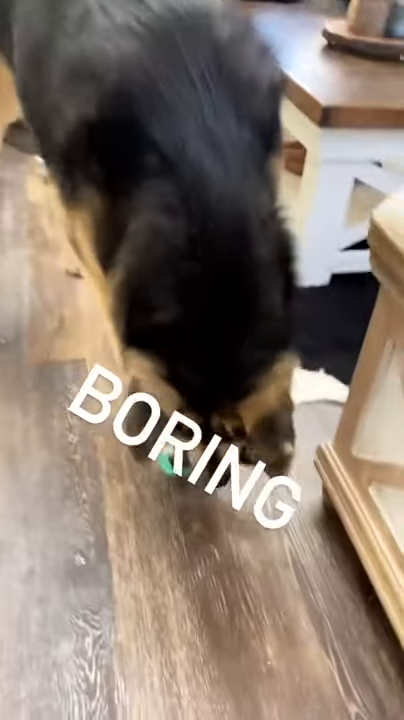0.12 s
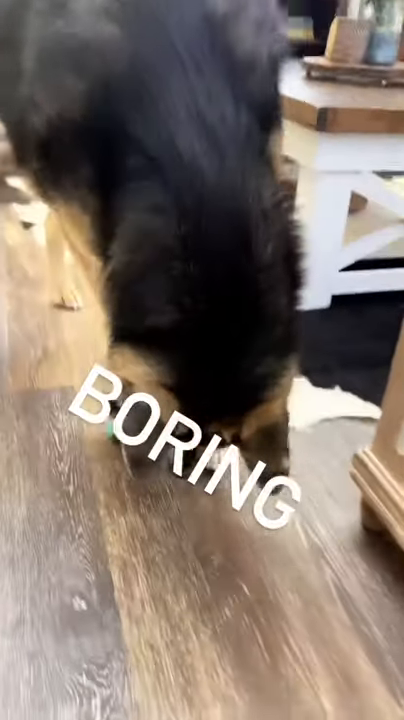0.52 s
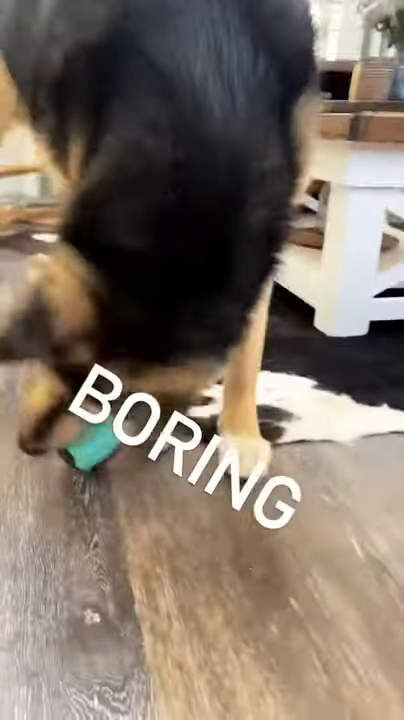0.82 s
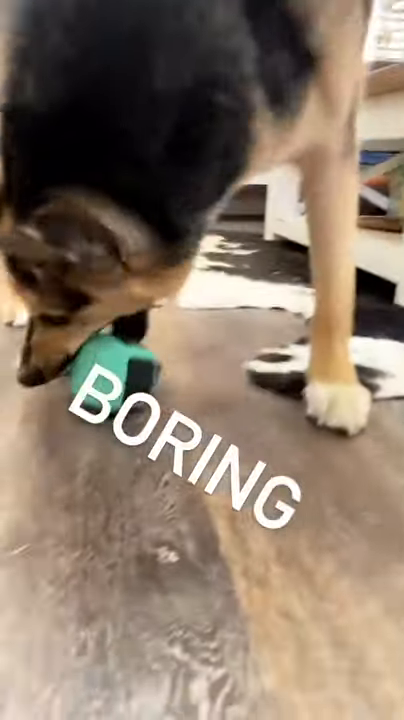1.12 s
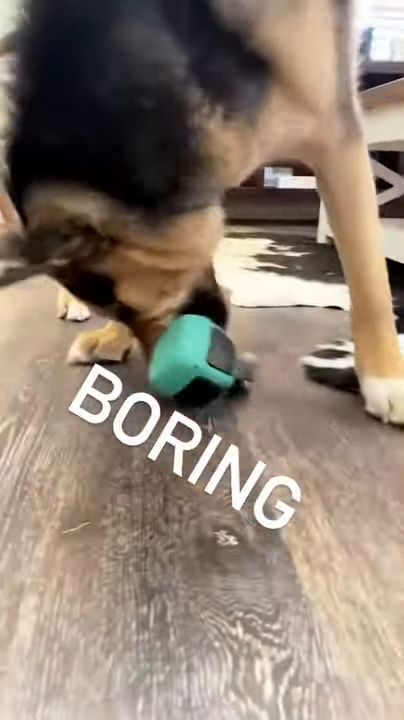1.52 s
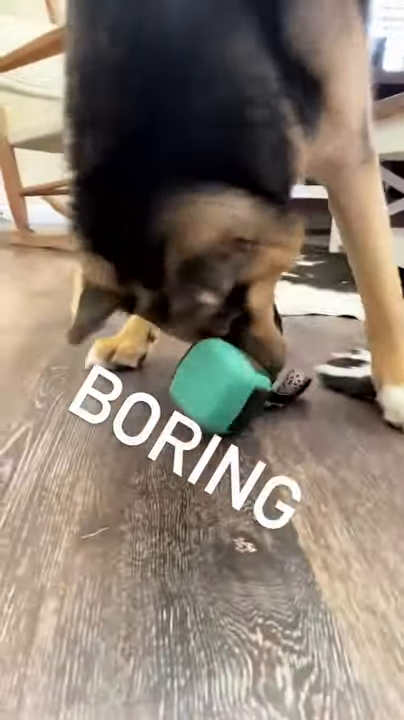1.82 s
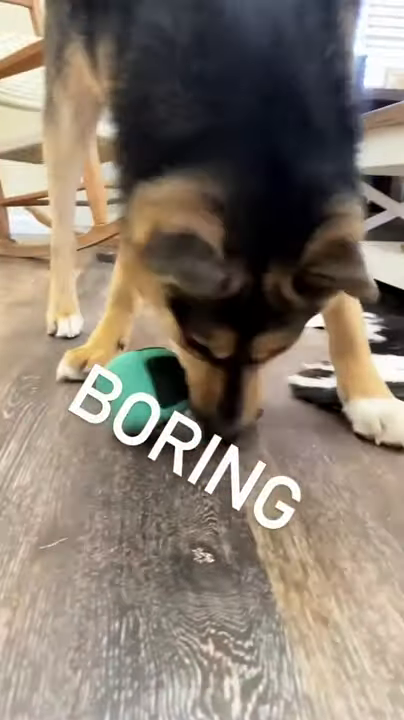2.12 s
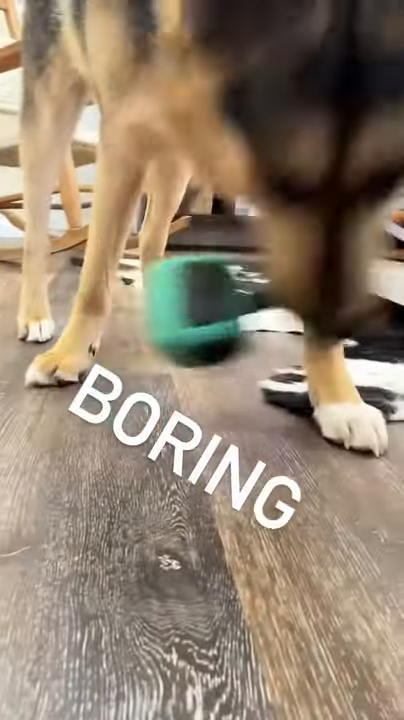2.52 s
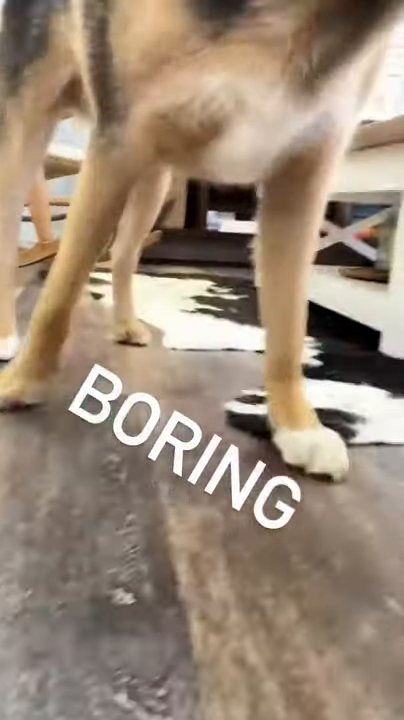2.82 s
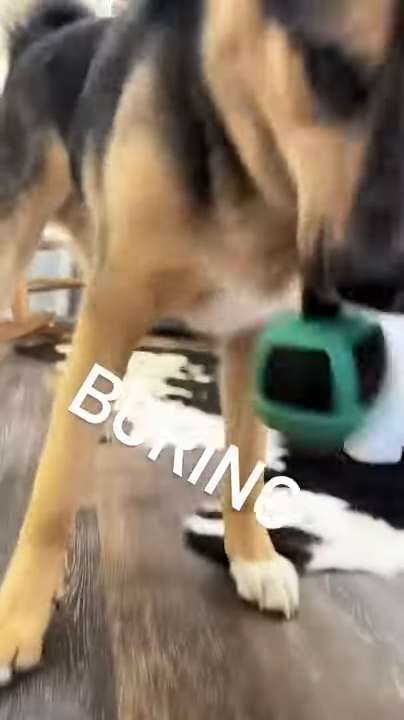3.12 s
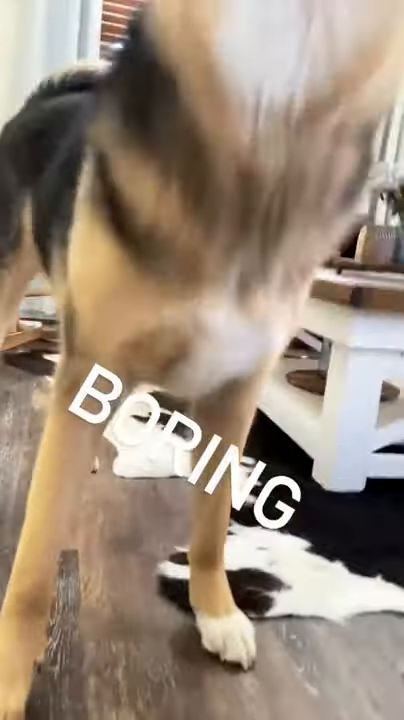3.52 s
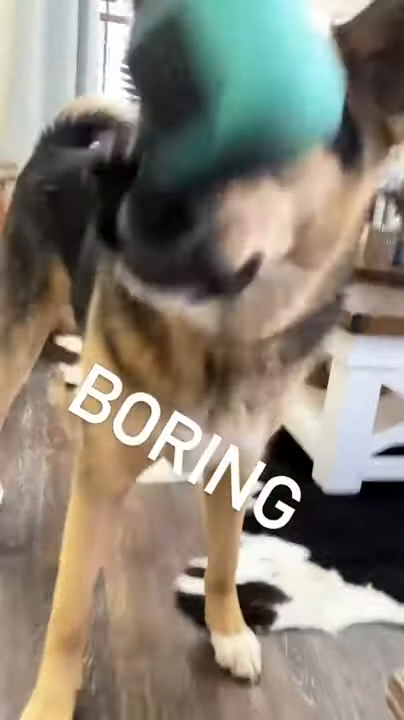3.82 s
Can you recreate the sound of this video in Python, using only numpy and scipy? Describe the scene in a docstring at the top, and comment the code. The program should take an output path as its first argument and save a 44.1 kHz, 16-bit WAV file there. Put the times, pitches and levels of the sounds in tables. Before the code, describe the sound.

A dog handles a soft ball on a wooden floor, close up. A knock with claw ticks lands at 0.27 s, dull thuds near 0.6, then scuffs, low thuds and a bright, loud tick cluster around 0.9-1.05. Lighter knocks follow at 1.25; 1.4-1.9 is nearly quiet. Breathy pants come at 2.0-2.2 and 2.7, a crisp knock at 2.93, nose puffs from 3.1, knocks at 3.35, and faint rubbing over low house hum in a short room echo.

```python
"""A large dog noses and swings a soft ball on a wooden floor, close to a phone with two microphone ports.
Claws and teeth tick and the ball knocks (noise bursts ringing one resonance); paws thud the boards (damped
modes); fur and fabric scuff and rub, with a few hollow, breathy pants (grainy noise); the dog puffs through
its nose (noise in gliding resonances). A house hums and rumbles underneath; a hand shifts on the phone."""
import sys
import numpy as np
from scipy import signal
from scipy.fft import rfft, irfft
from scipy.io import wavfile
from scipy.ndimage import uniform_filter1d, map_coordinates

SR = 44100
rng = np.random.default_rng(int(sys.argv[2]) if len(sys.argv) > 2 else 0)


def waveform_to_disk(signal):
    """Save audio, clipped to [-1, 1], as 16-bit WAV at the path in sys.argv[1]."""
    frames = np.transpose(np.atleast_2d(signal))
    scaled = np.clip(frames, -1, 1) * 32767
    samples = np.round(scaled).astype(np.int16)
    wavfile.write(sys.argv[1], SR, samples)


N = 174195
OPPOSITE = np.array([[1], [-1]])  # sign of a difference signal at the left and right port


def undb(db):
    """dB to gain."""
    return 10 ** (np.asarray(db) / 20)


def unit(x):
    """Scale to rms 1."""
    return x / np.sqrt(np.mean(x ** 2))


def bins_hz():
    """Frequency of every spectrum bin."""
    return np.arange(N // 2 + 1) * SR / N


def over_hz(table):
    """Read a (hz, value) table at every bin, along log frequency."""
    hz, value = np.array(table).T
    return np.interp(np.log(bins_hz() + 1), np.log(hz), value)


def shape(x, gain):
    """Filter by a gain per bin."""
    return irfft(rfft(x) * gain, N)


def tilt(db_per_octave):
    """Spectral slope about 2 kHz, flat outside 125 Hz to 16 kHz."""
    return undb(over_hz([(125, -4 * db_per_octave), (16000, 3 * db_per_octave)]))


def walk(rate_hz):
    """Slow random drift of rms 1: random steps, smoothed twice."""
    step = int(SR / rate_hz)
    steps = np.repeat(rng.standard_normal(size=500), step)[:N]
    return unit(uniform_filter1d(uniform_filter1d(steps, step), step))


def swell(start_s, attack_s, hold_s, release_s):
    """Squared rise, hold, then a fall of 20 dB per release time."""
    t = np.arange(N) / SR - start_s
    rise = np.clip(t / attack_s, 0, 1) ** 2
    fall_db = -20 * np.clip(t - attack_s - hold_s, 0, None) / release_s
    return rise * undb(fall_db)


def add(out, start_s, x):
    """Mix x into out from start_s."""
    i = int(start_s * SR)
    out[i:i + len(x)] += x[:N - i]


def house():
    """Rumble and faint hiss, partly unrelated at the two ports, with a hum wavering in pitch and level."""
    # hz, relative_db
    house_colour = [(25, -25), (42, -17), (60, -6), (70, -15), (86, -6.5), (120, -17.5), (156, -8.5),
                    (190, -18), (300, -26.5), (600, -41.5), (1500, -53), (4000, -61.5), (8000, -67.5),
                    (13000, -65)]
    # hz, side_to_mid_ratio: unrelated sound at the two ports
    house_diffuse = [(60, .01), (110, 0.02), (200, 0.093), (370, 0.45), (700, 0.75), (3000, 0.77),
                     (13000, 0.32)]
    rumble_db = -52
    hum_hz, hum_db, waver_hz, waver_db = 50.64, -51.5, 0.78, 0.6
    colour = undb(over_hz(house_colour))
    mid = shape(rng.standard_normal(N), colour)
    side = shape(rng.standard_normal(N), colour * over_hz(house_diffuse))
    rumble = undb(rumble_db) * (mid + side * OPPOSITE) / np.std(mid)
    phase = 2 * np.pi * np.cumsum(hum_hz + waver_hz * walk(6.18)) / SR
    hum = np.sin(phase) * undb(hum_db + waver_db * walk(4.4))
    return rumble + np.sqrt(2) * hum  # sqrt(2): hum_db is rms


def grains():
    """Dense tiny bursts of uneven size, over an equal share of steady noise."""
    grains_per_s, spread_db = 2500, 2.5
    happens = rng.random(N) < grains_per_s / SR
    bursts = happens * undb(spread_db * np.minimum(rng.exponential(size=N), 3.5))
    grainy = uniform_filter1d(bursts, size=12) * rng.standard_normal(N)
    return unit(grainy) + rng.standard_normal(N)


def hollow():
    """Hollow resonances of the scuffs and pants, pitched a little differently on each."""
    # pitch_hz, width_hz, lift_db
    hollow_modes = [(435, 52, 6), (1093, 42, 6), (1270, 1100, 10), (2170, 620, 6.5), (3370, 1200, 3),
                    (5850, 770, 5)]
    f = bins_hz()
    shift = 1 + 0.011 * rng.standard_normal()
    lift_db = sum(db / (1 + ((f - hz * shift) / (width / 2)) ** 2) for hz, width, db in hollow_modes)
    return undb(lift_db)


def scuffs_and_pants():
    """Grainy rubbing of fur, pads and fabric, and a few hollow, breathy pants, over a continuous faint rustle."""
    # start_s, attack_s, hold_s, release_s, level_db, tilt_db_per_octave
    # pants: near 2.0-2.2 and 2.7 s
    bursts = [(0.275, 0.006, 0.058, 0.23, -53.5, 8), (0.342, 0.024, 0.085, 0.041, -56.5, -2.5),
              (0.817, 0.021, 0.024, 0.037, -45.5, 9.5), (0.876, 0.014, 0.019, 0.027, -49, 9),
              (1.265, 0.0065, 0.029, 0.033, -62, 2), (1.318, 0.064, 0.13, 0.061, -63.5, 17),
              (1.921, 0.014, 0.066, .05, -67, 10), (2.008, 0.055, 0.076, 0.11, -50.5, -1.4),
              (2.089, 0.049, 0.045, 0.13, -52, -1.4), (2.371, 0.035, 0.004, 0.02, -56.5, -5),
              (2.472, 0.033, 0.024, 0.054, -57, 16), (2.669, 0.059, 0.049, 0.028, -50.5, -1.7),
              (2.824, 0.074, 0.038, 0.023, -57, -3), (2.921, 0.0029, 0.029, 0.092, -50.5, 9),
              (3.333, 0.017, 0.041, 0.044, -57, -0.5)]
    # hz, gain_db: before tilt
    burst_colour = [(150, 0.5), (400, 6), (750, 1.5), (1200, -4), (3000, 0), (5000, -2), (6200, -9),
                    (7500, -7.5), (10000, -20), (13000, -22.5)]
    # time_s, level_db: before random drift
    rustle_levels = [(0, -62), (.25, -70), (.42, -66.5), (.58, -58.5), (.96, -55), (1.25, -69.5),
                     (1.56, -75.5), (1.66, -85), (2.3, -88), (2.55, -69.5), (2.66, -102.5), (2.86, -71.5),
                     (3.08, -64), (3.3, -59), (3.6, -65), (3.95, -68)]
    rustle_tilt_db_per_octave = 0.4
    colour = undb(over_hz(burst_colour))
    rustle_db = np.interp(np.arange(N) / SR, *np.array(rustle_levels).T) + 2.5 * walk(32)
    rustle = unit(shape(rng.standard_normal(N), colour * tilt(rustle_tilt_db_per_octave)))
    out = undb(rustle_db) * rustle
    grainy = grains()
    for start_s, attack_s, hold_s, release_s, db, tilt_db in bursts:
        level = undb(db + 1.2 * walk(39.96)) * swell(start_s, attack_s, hold_s, release_s)
        noise = np.roll(grainy, rng.integers(N))
        out += level * unit(shape(noise, colour * hollow() * tilt(tilt_db)))
    return out


def hits(table):
    """A rough contact, swelling and fading, rings one damped resonance and cracks in the treble."""
    out, t = np.zeros(N), np.arange(2048) / SR
    high = signal.butter(2, 3000, "high", fs=SR)
    for start_s, db, hz, width_hz, contact_s, crack_db in table:
        force = t * np.exp(-2 * t / abs(contact_s))  # strongest at half the contact time
        rough = rng.standard_normal((2, len(t))) * force
        peak = signal.iirpeak(hz, hz / width_hz / 1.32, SR)  # widened, since applied twice
        ring = signal.lfilter(*peak, signal.lfilter(*peak, rough[0]))
        crack = signal.lfilter(*high, rough[1])
        hit = ring / abs(ring).max() + undb(crack_db) * crack / abs(crack).max()
        add(out, start_s, undb(db) * hit)
    return out


def knocks():
    """Ball and pads strike wood: mostly low, dull rings."""
    # start_s, ring_peak_db, ring_hz, nominal_ring_width_hz, contact_s, crack_re_ring_db
    knock_hits = [(.207, -47, 620, 248, 0.005, -25), (.219, -38.5, 537, 290, 0.0029, -11),
                  (.266, -26.5, 1410, 334, 0.0021, -19), (.269, -29.5, 425, 420, 0.0014, -28),
                  (.55, -46.5, 333, 150, 0.0027, -28), (.592, -36.5, 407, 378, 0.0022, -16),
                  (1.004, -33.5, 1020, 710, 0.005, -40), (1.2405, -40.5, 510, 390, 0.0024, -23),
                  (1.267, -53, 1550, 587, 0.0019, -16), (1.564, -54.5, 588, 312, 0.0052, -15),
                  (1.944, -49.5, 890, 348, 0.0011, -20), (2.127, -32, 1050, 800, 0.0054, -32),
                  (2.149, -36.5, 1200, 500, 0.0039, -28), (2.512, -46, 485, 292, 0.003, -28),
                  (2.93, -36, 1320, 910, 0.00087, -32), (3.3345, -35.5, 830, 590, 0.0018, -26),
                  (3.3615, -31, 935, 655, 0.0033, -30), (3.372, -49, 604, 407, 0.0045, -39),
                  (3.385, -54, 1380, 400, 0.0026, -25), (3.455, -46.5, 820, 504, 0.0039, 2.5),
                  (3.585, -40, 320, 115, 0.011, -24.5)]
    return hits(knock_hits)


def thuds():
    """Paw weight: a soft push sets the board modes ringing, most near the favoured pitch."""
    # start_s, peak_db, favoured_hz
    pushes = [(0.229, -34, 61.4), (0.261, -31.5, 80), (0.492, -38.5, 100), (.597, -35.5, 148),
              (0.624, -35, 52.5), (.91, -31, 103), (.929, -32.5, 123), (0.967, -35.5, 155),
              (.985, -33.5, 61.3), (1.023, -38.5, 150), (1.06, -35, 62), (1.238, -37.5, 150),
              (1.298, -35, 105), (1.919, -40.5, 160), (2.93, -35, 196), (2.958, -40.5, 164),
              (3.345, -36.5, 78.6), (3.651, -39.5, 99)]
    # mode_hz, level_db, t60_s: before detuning and favouring
    boards = [(49.7, 0, 0.34), (102.2, -5, 0.079), (121, -5, 0.13), (159.8, 0.5, 0.15), (211.5, -7.5, 0.11),
              (308.5, -19.5, 0.11)]
    push_s, favour_db_per_octave = 0.006, 15.5
    out, t = np.zeros(N), np.arange(SR // 2) / SR
    push = np.hanning(int(push_s * SR) + 3)
    for start_s, db, favoured_hz in pushes:
        detune = 1 + 0.037 * rng.standard_normal(len(boards))
        ring = np.zeros(len(t))
        for (mode_hz, mode_db, t60_s), ratio in zip(boards, detune):
            off_favour_db = favour_db_per_octave * abs(np.log2(mode_hz / favoured_hz))
            decay = undb(mode_db - off_favour_db - 60 * t / t60_s)
            ring += decay * np.sin(2 * np.pi * mode_hz * ratio * t)
        ring = np.convolve(ring, push)
        add(out, start_s, undb(db) * ring / abs(ring).max())
    return out


def ticks():
    """Claws and teeth strike: short, mostly high rings."""
    # start_s, ring_peak_db, ring_hz, nominal_ring_width_hz, contact_s, crack_re_ring_db
    tick_hits = [(.267, -31.5, 2960, 400, 0.002, -7), (.2912, -27.5, 1930, 1540, 0.00045, -3.5),
                 (.2918, -29.5, 5500, 1500, 0.00091, -12), (.9715, -28.5, 2800, 1186, 0.0026, -15),
                 (.9718, -31, 4700, 1760, 0.009, -30), (.9942, -20, 6000, 1820, 0.0062, -23.5),
                 (.9975, -20.5, 4270, 1830, 0.0012, -26), (1.001, -21, 3050, 1230, 0.0025, -20),
                 (1.005, -17.5, 6100, 910, 0.0037, -12.5), (1.009, -26, 4130, 1500, 0.0035, -17.5),
                 (1.014, -24.5, 2330, 2100, 0.0011, 0), (2.4085, -44, 1950, 690, 0.0028, -3),
                 (2.5155, -50, 3860, 900, 0.0027, 13), (2.575, -52, 3930, 1200, 0.0026, 10.5),
                 (2.7655, -37, 3820, 1520, 0.0038, -21), (2.766, -33.5, 6230, 1830, 0.0044, -4),
                 (2.9275, -28.5, 5180, 2460, 0.0039, 2.5), (3.317, -40, 2220, 1020, 0.0024, -27)]
    return hits(tick_hits)


def puffs():
    """Nose air: fluttering noise through the resonances of the snout, which glide as the nostrils move."""
    # start_s, attack_s, hold_s, release_s, level_db, resonance_ratio, tilt_db_per_octave, rise_per_s
    breaths = [(0.532, 0.13, 0.14, 0.11, -56.5, 1.01, 5, 0.18),
               (1.013, 0.011, 0.031, 0.14, -51, 1.1, 8, -.2),
               (1.73, 0.05, 0.049, 0.063, -69.5, 1.3, 1.5, 0.14),
               (3.096, 0.079, 0.054, 0.069, -54.5, 0.83, -2.5, .8),
               (3.328, 0.15, 0.18, 0.18, -57, 0.94, 3.5, 0.33)]
    # resonance_hz (before ratio and glide), width_hz, level_db
    snout = [(857, 120, 0.5), (1250, 180, -13.5), (1880, 950, -2.5), (2290, 530, 5.5), (3040, 530, 3.5),
             (4050, 870, 1), (5000, 1000, -2), (6690, 3300, -26)]
    out, f, t = np.zeros(N), bins_hz() + 1, np.arange(N) / SR
    for start_s, attack_s, hold_s, release_s, db, ratio, tilt_db, rise_per_s in breaths:
        power = sum(undb(2 * g) / (1 + ((f - hz * ratio) / (w / 2)) ** 4) for hz, w, g in snout)
        air = unit(shape(rng.standard_normal(N), power ** .5 * tilt(tilt_db)))
        air = air * undb(3.2 * walk(30))
        # glide: read the noise ever faster or slower for 1 s
        since_s = np.clip(t - start_s, 0, 1)
        air = map_coordinates(air, [(t + rise_per_s * since_s ** 2 / 2) * SR], mode="mirror")
        out += undb(db) * swell(start_s, attack_s, hold_s, release_s) * air
    return out


def grip():
    """The hand shifts on the phone: band-limited low rumble, opposite at the two ports."""
    # start_s, attack_s, hold_s, release_s, level_db
    shifts = [(0.819, 0.065, 0.082, 0.041, -40.5)]
    # low and high edge, Hz
    band_hz = [55, 160]
    band = signal.butter(3, band_hz, "band", fs=SR, output="sos")
    low = unit(signal.sosfilt(band, rng.standard_normal(N)))
    level = sum(undb(db) * swell(*times_s) for *times_s, db in shifts)
    return level * low * OPPOSITE


def rubs():
    """Grainy friction that sings in one narrow resonance."""
    # start_s, hold_s, level_db, pitch_hz
    singing = [(0.825, 0.023, -54, 1200), (1.26, 0.021, -68.5, 1010), (2.323, 0.045, -62.5, 2000),
               (2.678, 0.089, -57, 1260), (3.108, 0.037, -60.5, 1300), (3.13, .1, -62, 2100),
               (3.523, 0.24, -64, 3820)]
    attack_s, release_s = 0.025, 0.03
    width_share = 0.26  # width / pitch of each of two filter passes
    out, rub = np.zeros(N), grains()
    for start_s, hold_s, db, hz in singing:
        peak = signal.iirpeak(hz, 1 / width_share, SR)
        stroke = np.roll(rub, rng.integers(N))
        band = signal.lfilter(*peak, signal.lfilter(*peak, stroke))
        out += undb(db) * swell(start_s, attack_s, hold_s, release_s) * unit(band)
    return out


def room(x):
    """Echo: a short noise tail whose treble dies first, different at each port."""
    # hz, side_gain: unrelated sound at the two ports
    echo_diffuse = [(200, 0.037), (670, 1), (1250, 0.74), (2500, 0.74), (8000, 1)]
    t60_s, treble_t60_s, split_hz, echo_db = 0.3, 0.21, 4100, -12.5
    t = np.arange(SR // 2) / SR
    noise = rng.standard_normal((2, len(t))) * np.clip(t / 0.0017, 0, 1)
    dull = signal.sosfilt(signal.butter(3, split_hz, fs=SR, output="sos"), noise)
    treble = noise - dull
    tail = dull * undb(-60 * t / t60_s) + treble * undb(-60 * t / treble_t60_s - 10.5)
    tail = signal.sosfilt(signal.butter(1, 90, "high", fs=SR, output="sos"), tail)
    tail /= np.sqrt(np.sum(tail ** 2, axis=1, keepdims=True))  # unit energy
    mid, side = undb(echo_db) * signal.fftconvolve(x[None], tail, axes=1)[:, :N]
    return mid + shape(side, over_hz(echo_diffuse)) * OPPOSITE


def scene():
    """The dog close by, its echo, the house and the hand."""
    dog = ticks() + knocks() + puffs() + scuffs_and_pants() + thuds() + rubs()
    return dog + room(dog) + house() + grip()


def record(dry):
    """Colour the microphones, set the phase between ports by frequency, cut deep bass and top."""
    # hz, gain_db
    mic_colour = [(4000, 0.5), (6000, 2), (8500, 7), (11000, -5)]
    # hz, left_lead_rad
    port_phase = [(1500, 0), (2500, 0.78), (4200, 1.24), (5200, 1.97), (6500, 1.76), (7800, 4),
                  (13000, 1.5)]
    bass_cut_hz, top_hz = 34.7, 13600
    lead = np.exp(1j * over_hz(port_phase) / 2 * OPPOSITE)  # half the lead on each side
    ports = shape(dry, undb(over_hz(mic_colour)) * lead)
    cut = signal.sosfilt(signal.butter(3, bass_cut_hz, "high", fs=SR, output="sos"), ports)
    return signal.sosfilt(signal.ellip(8, .2, 70, top_hz, fs=SR, output="sos"), cut)


dry = scene()
out = record(dry)
waveform_to_disk(out)
```